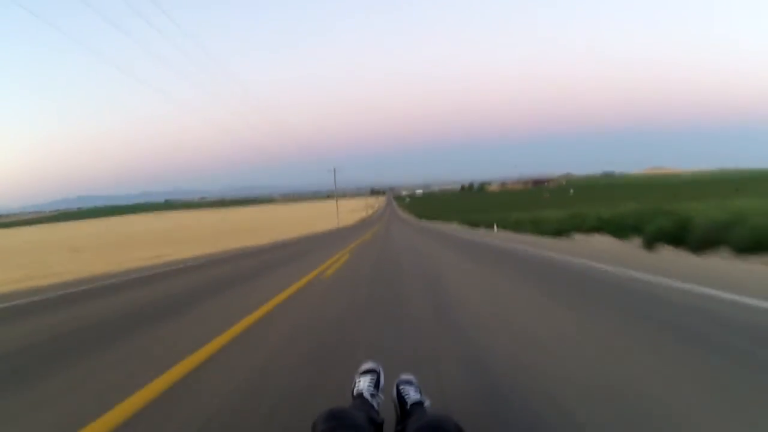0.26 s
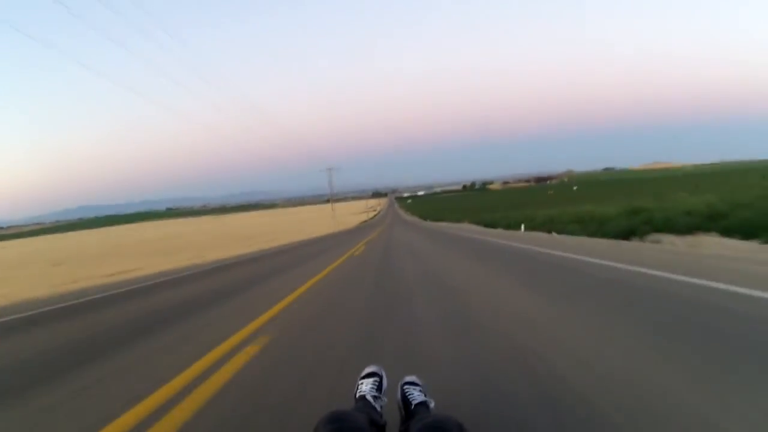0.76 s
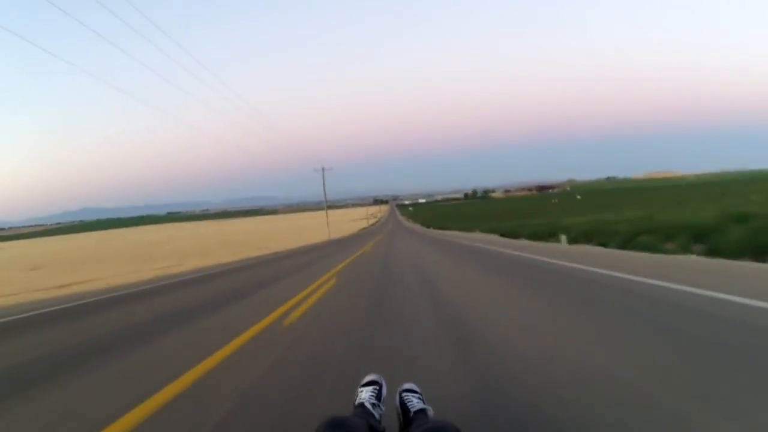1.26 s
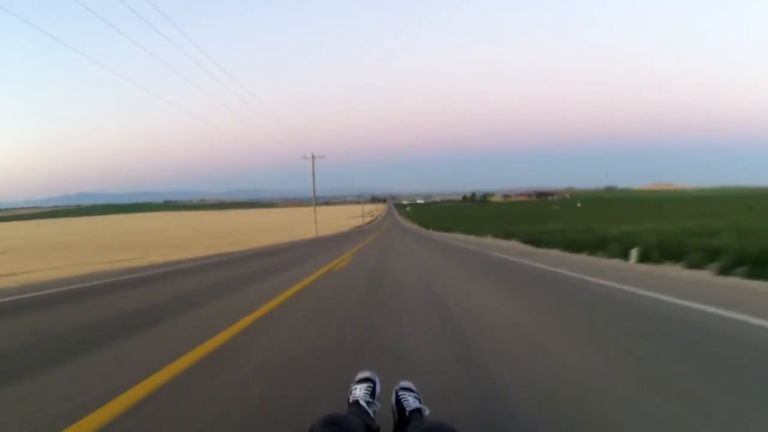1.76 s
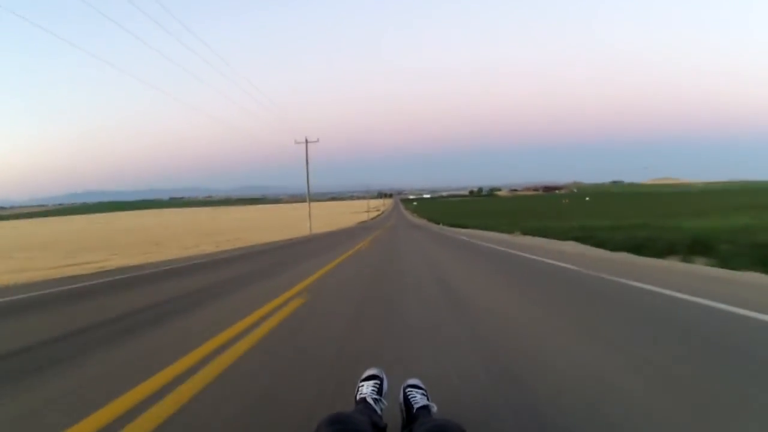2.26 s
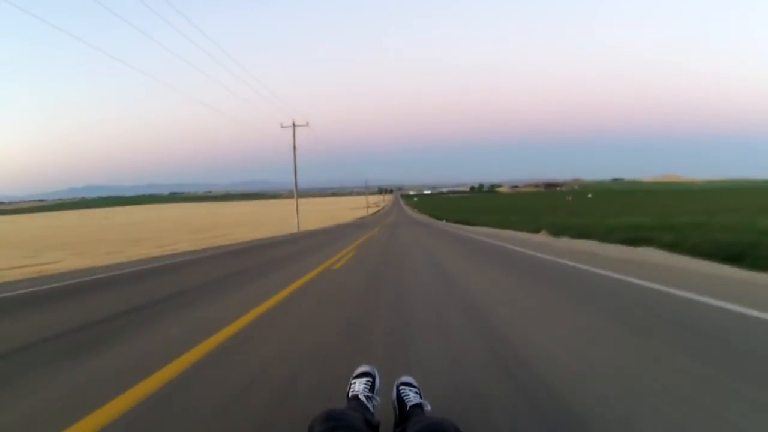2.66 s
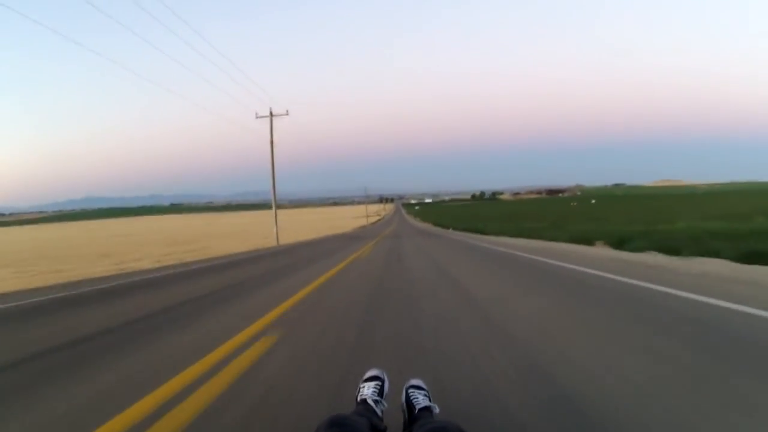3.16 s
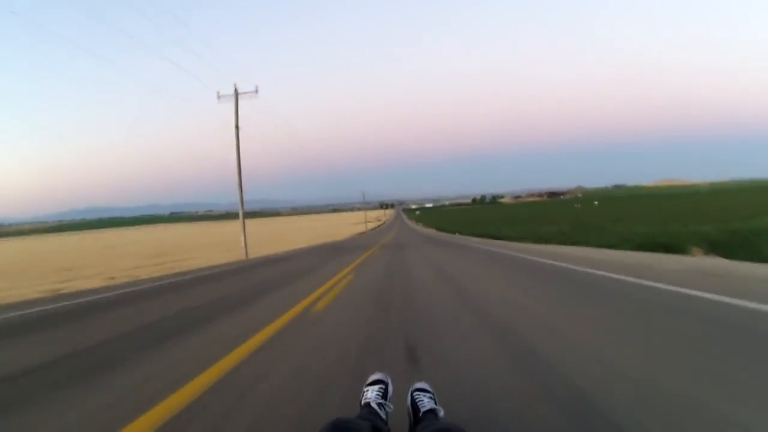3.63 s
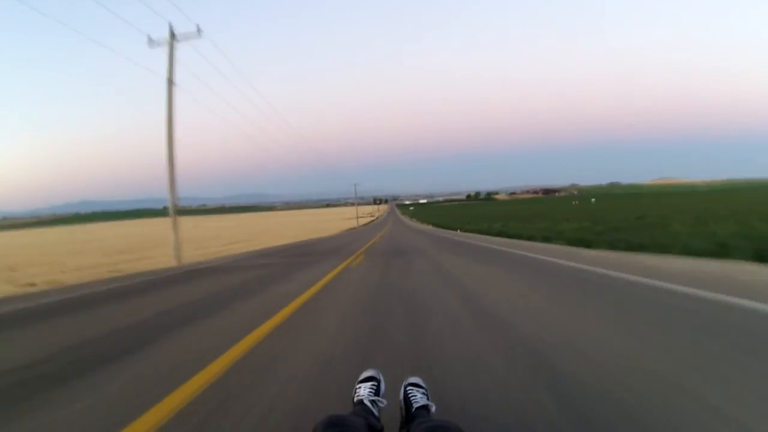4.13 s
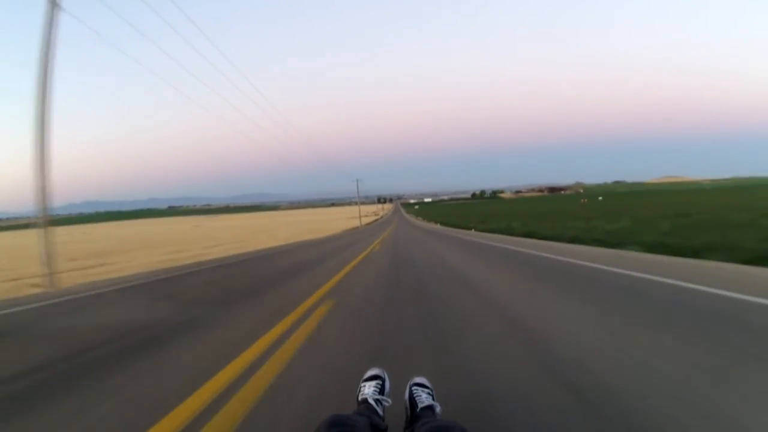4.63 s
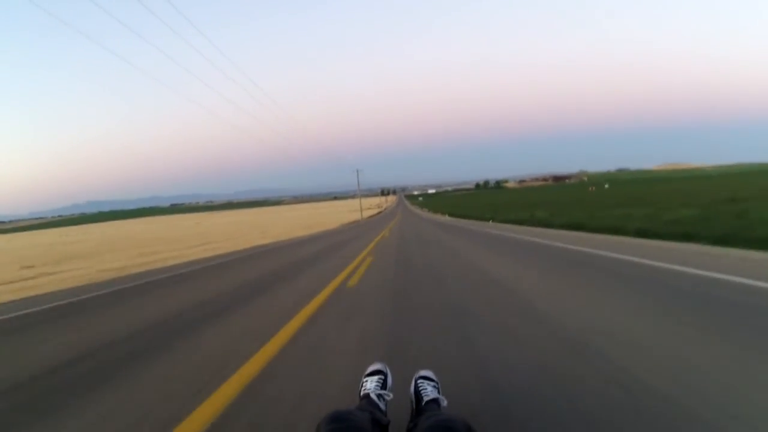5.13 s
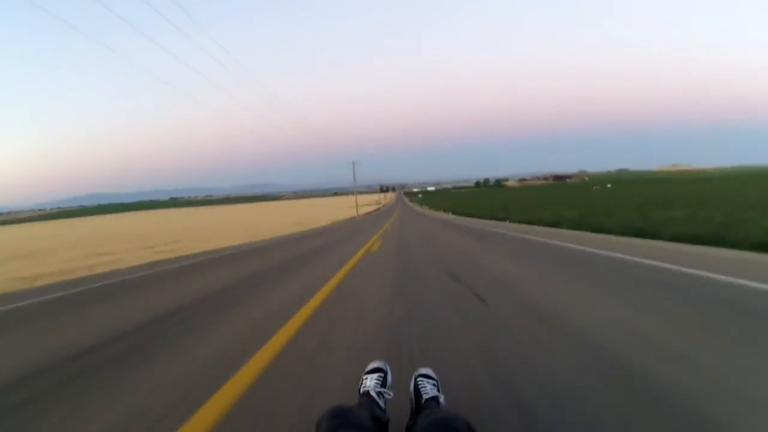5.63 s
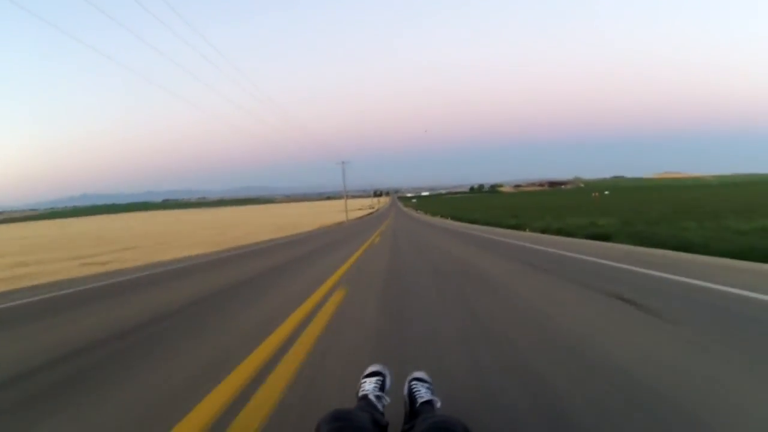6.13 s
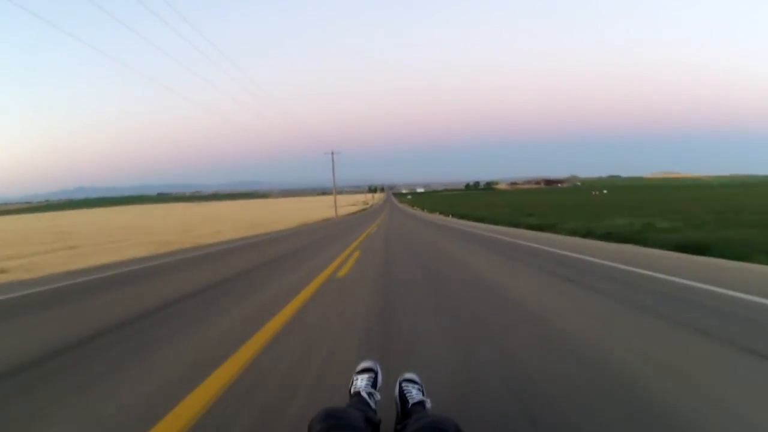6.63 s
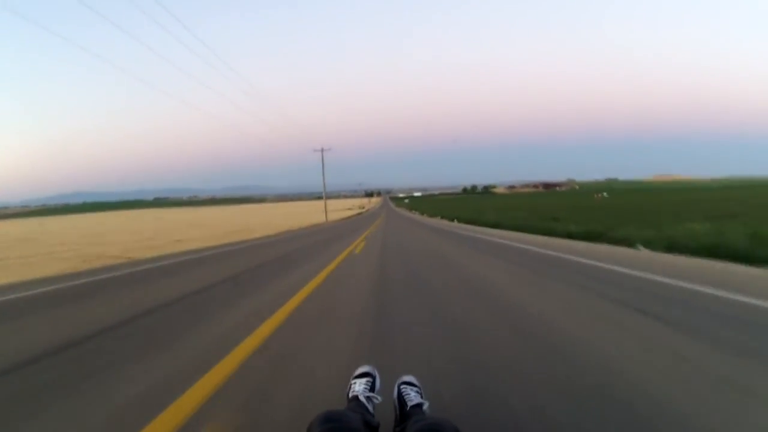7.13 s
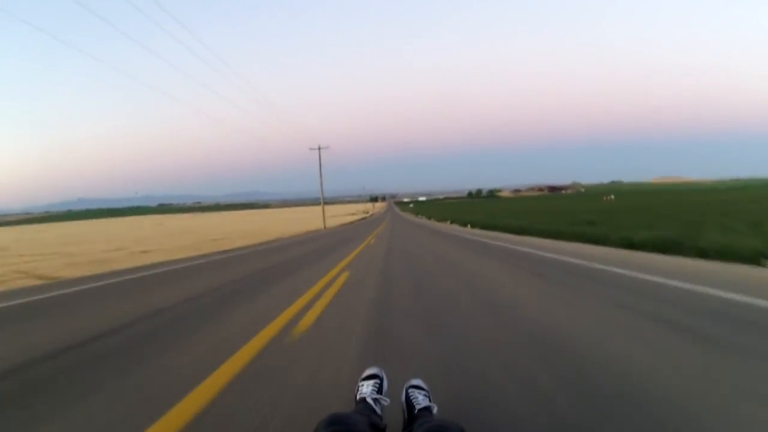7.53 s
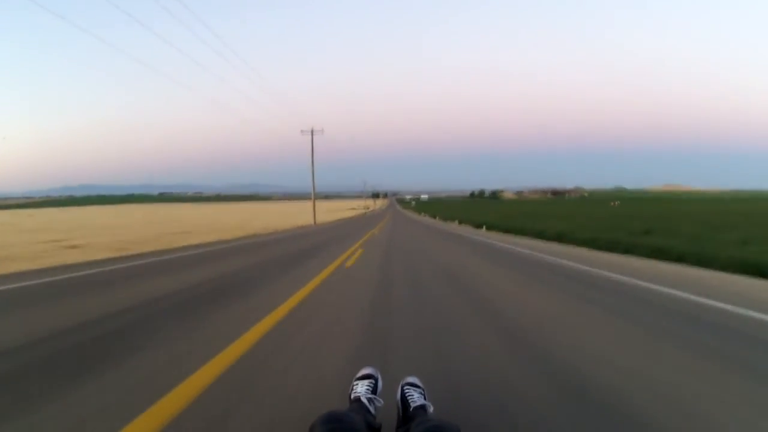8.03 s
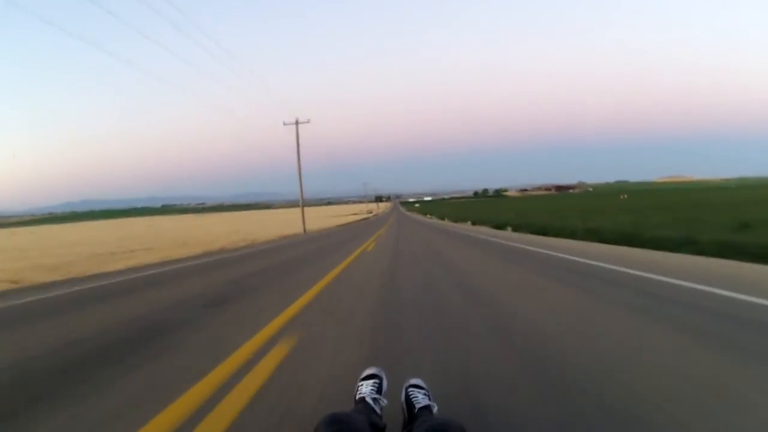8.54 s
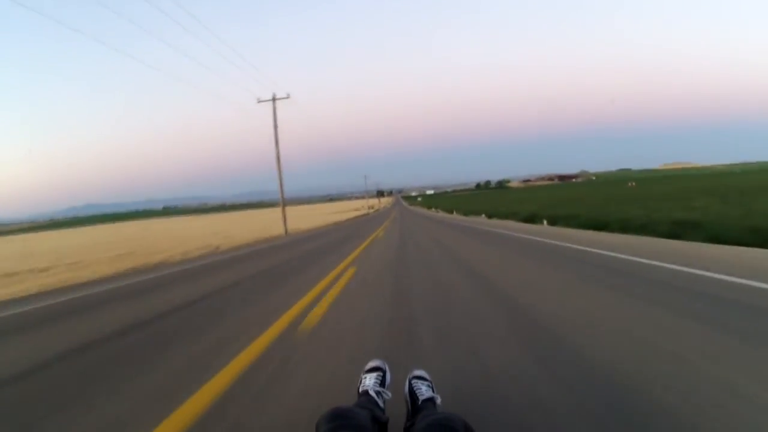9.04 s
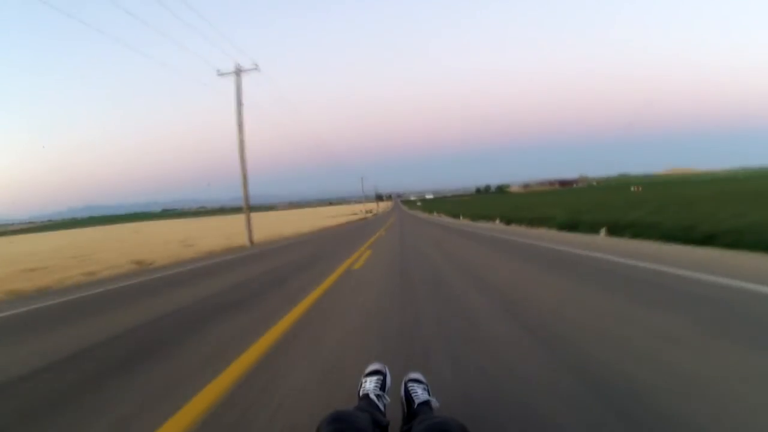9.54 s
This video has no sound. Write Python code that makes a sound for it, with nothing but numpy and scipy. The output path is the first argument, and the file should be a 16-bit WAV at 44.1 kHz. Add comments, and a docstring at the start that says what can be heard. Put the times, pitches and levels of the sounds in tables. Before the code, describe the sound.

Small hard board wheels race down asphalt, a loud boxy low-mid rumble shaking the microphone's case, with irregular knocks, thin hiss and lumpy wind.

```python
"""A board on small hard wheels runs fast down an asphalt road, heard by one microphone in a closed case.
Road grain and wind shake the case: noise through a few boomy modes, with jolts as short low rings that
swell and fade within a few cycles. Wheels and air make shaped hiss with chirping stones; wind adds low,
lumpy noise. Noise puffs tick above, and one piece of grit rings the shell.
Jolts push the level over a limit: the gain steps down and creeps back."""
import sys
import numpy as np
from scipy import signal
from scipy.fft import rfft, irfft, next_fast_len
from scipy.io import wavfile
from scipy.ndimage import uniform_filter1d

SR = 44100
rng = np.random.default_rng(int(sys.argv[2]) if len(sys.argv) > 2 else 0)


def ratio(d):
    """dB to gain"""
    e = np.asarray(d, float) / 20
    return 10 ** e


def pcm_store(signal):
    """Save signal as 16-bit PCM."""
    levels = np.round(np.clip(np.atleast_2d(signal), -1, 1) * 32767)
    wavfile.write(sys.argv[1], SR, levels.astype(np.int16).T)


N = 431738


def evened(x):
    """Scales to rms 1."""
    return x / np.sqrt(np.mean(x ** 2) + 1e-20)


def coloured(x, points):
    """Filters x by a spectrum drawn on a log-frequency axis, then scales it to rms 1."""
    size = next_fast_len(N)
    points_hz, points_db = np.transpose(points)
    hz = np.fft.rfftfreq(size, 1 / SR)
    curve_db = np.interp(np.log(hz + 1), np.log(points_hz + 1), points_db)
    return evened(irfft(rfft(x, size) * ratio(curve_db), size)[:N])


def wander(hz):
    """Slow random curve of rms 1: noise through a one-pole low-pass at hz."""
    noise = uniform_filter1d(rng.standard_normal(N), size=64)
    return evened(signal.lfilter([1], [1, -np.exp(-2 * np.pi * hz / SR)], noise))


# slow swells of the ride, as rms before flutter and gain control: time_s, shake_db, hiss_db, buffet_db
RIDE_SWELLS = [(0.0, -11.5, -28, -31), (0.6, -13, -29, -28.5), (1.1, -12.5, -28, -28.5),
               (1.5, -12.5, -27.5, -28.5), (2.001, -10.5, -26, -28.5), (2.7, -11.5, -27, -29),
               (3.3, -10, -26, -26), (3.9, -11, -27, -31), (4.4, -11.5, -27.5, -29),
               (5.0, -12.5, -27.5, -31), (5.5, -10.5, -25.5, -27), (6.2, -13, -29, -31),
               (6.7, -12, -27.5, -27), (7.2, -12.5, -26.5, -29), (7.6, -11.5, -28, -30.5),
               (8.1, -13, -27.5, -29.5), (8.8, -11.5, -25.5, -24), (9.3, -11.5, -27, -32.5),
               (9.79, -11.5, -25.5, -27.5)]


def ride(column):
    """Gain curve of one layer, gliding in dB between the points of the ride."""
    columns = np.transpose(RIDE_SWELLS)
    return ratio(np.interp(np.arange(N) / SR, columns[0], columns[column]))


# boomy modes of the case: pitch_hz, width_hz (at half amplitude), level_db (against each other)
CASE_MODES = [(234, 46.4, -3), (316, 88, -2), (369, 118, 0), (521.7, 114, -2), (802, 215, -12.5),
              (1084, 394, -23)]
WAVER_DB, WAVER_HZ = 0.7, 3  # rms swell of each mode on its own, and its rate
TRAVEL = 3.46  # the swing is softly held below this many times its rms, then levelled again


def case_shake():
    """Random shaking excites each steep-sided mode of the case independently; its travel is limited."""
    size = next_fast_len(N)
    hz = np.fft.rfftfreq(size, 1 / SR)
    shake = np.zeros(size)
    for pitch_hz, width_hz, level_db in CASE_MODES:
        response = ratio(level_db) / (1 + (2 * (hz - pitch_hz) / width_hz) ** 2)
        mode = irfft(rfft(rng.standard_normal(size)) * response, size)
        shake += mode * np.resize(ratio(WAVER_DB * wander(WAVER_HZ)), size)
    shake = evened(shake)
    swing = abs(signal.hilbert(shake)) / TRAVEL + 1e-9
    return evened(shake / (1 + swing ** 6) ** (1 / 6))[:N] * ride(column=1)


# tone curve of the rolling and air hiss: pitch_hz, level_db (per Hz, relative)
HISS_CURVE = [(760, -31), (1300, -2.5), (1480, -5), (1980, -0.5), (3330, -2), (4820, -9), (5340, -17),
              (6870, -19), (8430, -35), (9960, -45.5), (12000, -50.5), (15600, -79.5), (22000, -120)]
# narrow rings of wheels and board, boosted in the hiss: pitch_hz, width_hz, boost_db
WHEEL_RINGS = [(1950, 67, 1), (2240, 62, 2.5), (2810, 300, 2.5), (3330, 200, 2)]
GRAINS_PER_S, GRAINS_DB, GRAIN_S = 400, -14, .0004  # stones: rate, level under the raw hiss, time to crest


def hiss():
    """Rolling and air noise that flickers, with sparse stones chirping in it at various pitches."""
    smooth = rng.standard_normal(N) * ratio(0.37 * wander(hz=13) + 0.89 * wander(hz=60))
    sizes = ratio(3.5 * np.minimum(rng.exponential(1, N), 3.5))
    stones = (rng.random(N) < GRAINS_PER_S / SR) * sizes
    kind, t = rng.integers(0, 24, N), np.arange(400) / SR
    blip = t / GRAIN_S * np.exp(-t / GRAIN_S)
    crackle = np.zeros(N)
    for k, hz in enumerate(np.linspace(1500, 8000, 24)):
        chirp = blip * np.sin(2 * np.pi * hz * t)
        crackle += signal.oaconvolve(stones * (kind == k), chirp)[:N]
    rough = evened(smooth) + ratio(GRAINS_DB) * evened(crackle)
    for hz, width_hz, boost_db in WHEEL_RINGS:
        ring = signal.lfilter(*signal.iirpeak(hz, hz / width_hz, SR), rough)
        rough = rough + (ratio(boost_db) - 1) * ring
    return coloured(rough, HISS_CURVE) * ride(column=2)


# tone curve of the wind buffeting: pitch_hz, level_db (per Hz, relative)
BUFFET_CURVE = [(8.8, -35.5), (15, -12.5), (43, 0.5), (90, 2.5), (180, -1), (230, -31.5), (400, -120)]
LUMPS_DB, LUMPS_HZ = 2, 3.4  # rms of the random swells before the tone curve, and their rate


def buffet():
    """Low, lumpy wind pressure on the case: deep noise that swells and sags at random."""
    lumpy = rng.standard_normal(N) * ratio(LUMPS_DB * wander(LUMPS_HZ))
    return coloured(lumpy, BUFFET_CURVE) * ride(column=3)


# jolts, each with a faint treble tick: crest_s, level_db (before flutter and gain control),
# tick_db (of the noise puff before its band filter)
JOLT_HITS = [(0.0958, 1, -46), (0.4731, 0, -48), (0.995, -1, -51), (1.2204, -0.2, -45), (1.7295, -0.3, -48),
             (1.7819, 3, -46), (1.919, -4, -45.5), (2.2142, 3, -44), (2.4905, 1, -47), (3.1103, -2, -52),
             (3.2138, 5.5, -36), (3.5463, 0, -47), (3.7675, 2, -41), (4.0805, -3, -43), (4.4927, 1.5, -52),
             (5.4443, 2.5, -42), (5.7090, -3, -43), (6.1913, -4, -49), (6.4338, -3, -52), (6.879, 1, -46),
             (7.1814, 0.2, -45), (7.2938, -7, -49.5), (7.808, 1, -49.5), (8.019, -1.5, -46),
             (8.2922, -3.5, -52), (8.6010, -0.4, -51.5), (9.12, -2.7, -47), (9.1810, 3, -38.5),
             (9.5945, 3, -42.5), (9.7421, -1.5, -44)]
JOLT_HZ, JOLT_S = 358, 0.0025  # middle pitch, half length
JOLT_HUSH = 0.61  # share of the shaking that a jolt displaces at its crest


def jolts(shake):
    """Each jolt displaces the shaking with a low ring, either way up, that swells and fades in a few cycles."""
    span = np.arange(-1000, 1000)
    bell = np.exp(-(span / SR / JOLT_S) ** 2)
    for crest_s, level_db, _ in JOLT_HITS:
        hz = JOLT_HZ * (1 + 0.19 * (rng.random() - .5))
        ring = np.cos(2 * np.pi * hz * span / SR) * np.sign(rng.random() - .5)
        part = shake[round(crest_s * SR) + span[0]:][:len(span)]
        part[:] = part * (1 - JOLT_HUSH * bell) + ratio(level_db) * bell * ring
    return shake


TICK_S, TICK_BAND_HZ = .0012, [7000, 14000]  # half length, band
TICK_LEAD_S = .0018  # a puff starts this long before the crest of its jolt, so it peaks just ahead of it
STRAY_PER_S, STRAY_DB = 14, -59  # ticks at random moments: rate, middle level before the band filter
TICK_APART = .6  # each channel's own noise against the shared noise


def ticks():
    """Brief puffs of band-passed noise, just before each jolt and at random moments."""
    stray = rng.random(N) < STRAY_PER_S / SR
    size = ratio(STRAY_DB + 3 * rng.standard_normal(N)) * stray
    crest_s, _, tick_db = np.transpose(JOLT_HITS)
    size[np.round((crest_s - TICK_LEAD_S) * SR).astype(int)] = ratio(tick_db)
    puff = np.exp(-(np.arange(300) / SR / TICK_S - 1) ** 2)
    noise = rng.standard_normal(N) + TICK_APART * rng.standard_normal((2, N))
    puffs = signal.oaconvolve(size, puff)[:N] * noise
    return signal.sosfilt(signal.butter(1, TICK_BAND_HZ, "band", fs=SR, output="sos"), puffs)


# ring of the shell under the grit: pitch_hz, level_db (against the whole hit), length_s
SHELL_RING = [(5200, 1.5, 0.001), (2400, -7.5, 0.0015), (6550, -7.5, 0.001), (9100, -18, .0012),
              (10700, -25, 0.00099), (14600, -23, .0008)]
GRIT_S, GRIT_DB = 4.3030, -2.1  # start, level of the whole hit before gain control
CRACK_DB, CRACK_S = -27, .0012  # noisy crack against the whole hit, length


def grit():
    """One piece of grit hits the case: the shell rings bright and stops short, with a crack at its start."""
    t = np.arange(N) / SR - GRIT_S
    ring = np.zeros(N)
    for hz, level_db, length_s in SHELL_RING:
        ring += ratio(level_db) * np.exp(-(t / length_s) ** 2) * np.sin(2 * np.pi * hz * t)
    crack = ratio(CRACK_DB) * np.exp(-(t / CRACK_S) ** 2) * rng.standard_normal(N)
    return ratio(GRIT_DB) * (t > 0) * (ring + crack)


FLUTTER_DB = 0.71  # rms; rough asphalt makes case, hiss and buffeting flutter together
FADE_S = .004  # at both ends


def scene():
    """One microphone feeds both channels; only the ticks differ between them."""
    rolling = jolts(case_shake()) + hiss() + buffet()
    mono = rolling * ratio(FLUTTER_DB * wander(hz=30.4)) + grit()
    return (mono + ticks()) * signal.windows.tukey(N, 2 * FADE_S * SR / N)


def top_cut(x):
    """Nothing passes above the cut-off."""
    return signal.sosfilt(signal.butter(12, 16470, fs=SR, output="sos"), x)


LIMIT_DB, RECOVER_DB_PER_S = -1.5, 9
CIRCUIT_DB, DRIFT = -70.5, 0.0092  # hiss of each channel; rms wander of the balance, as a share of gain
TOP_HZ = 15300  # low-pass


def record(dry):
    """Gain follows the peak of the block before, down at once and up slowly; then overload and low-pass."""
    block = 16  # samples
    sensed = abs(uniform_filter1d(dry.mean(0), size=9))  # the detector misses very short spikes
    peak_db = 20 * np.log10(np.maximum.reduceat(sensed, np.arange(0, N, block)) + 1e-9)
    fall_db = np.arange(len(peak_db)) * block / SR * RECOVER_DB_PER_S
    held_db = np.maximum.accumulate(peak_db + fall_db) - fall_db
    over_db = np.maximum(held_db - LIMIT_DB, 0)
    steps_db = np.repeat(np.r_[0, over_db], block)[:N]
    steps_db = uniform_filter1d(steps_db, size=12)  # each step is a short ramp
    lean = DRIFT * wander(hz=20)
    wet = dry / ratio(steps_db) * [1 + lean, 1 - lean]
    wet = wet + ratio(CIRCUIT_DB) * rng.standard_normal((2, N))
    wet = np.clip(wet, -1, 1)
    wet = signal.oaconvolve(wet, signal.firwin(255, TOP_HZ, fs=SR)[None], "same")
    return top_cut(wet)


dry = scene()
out = record(dry)
pcm_store(out)
```